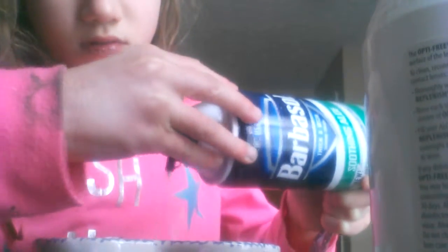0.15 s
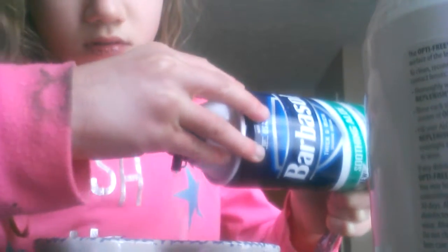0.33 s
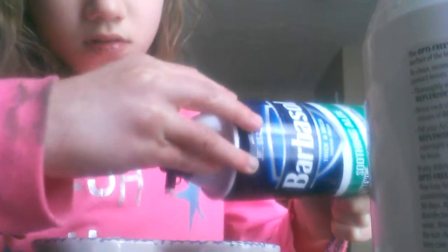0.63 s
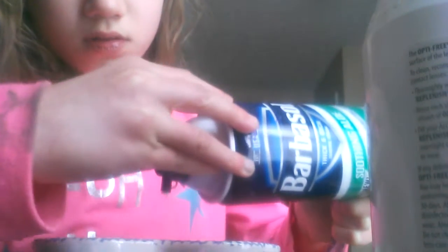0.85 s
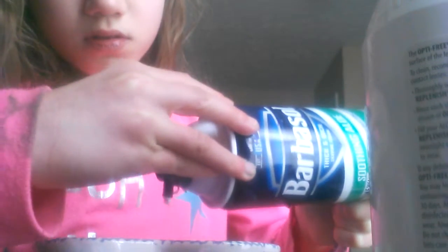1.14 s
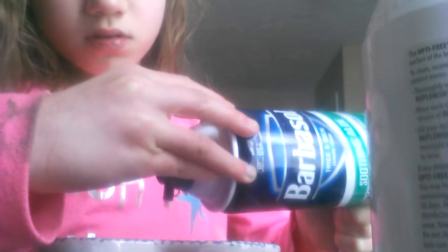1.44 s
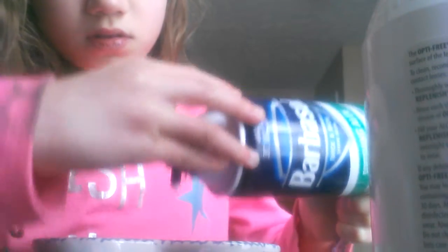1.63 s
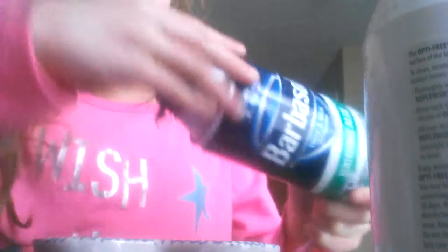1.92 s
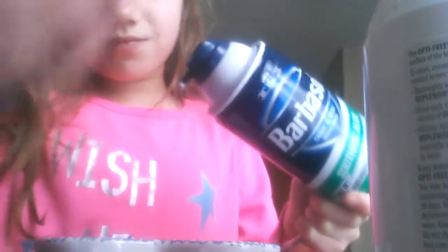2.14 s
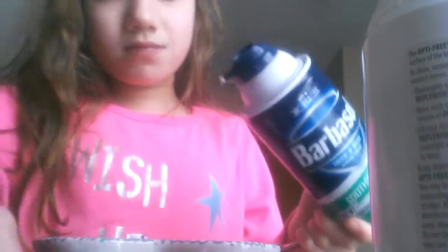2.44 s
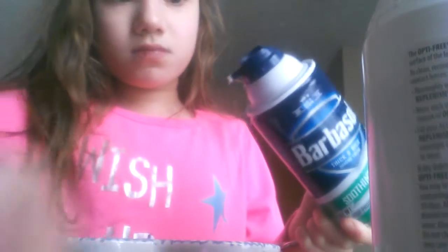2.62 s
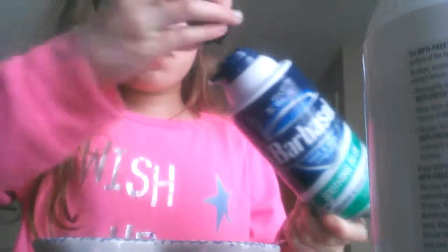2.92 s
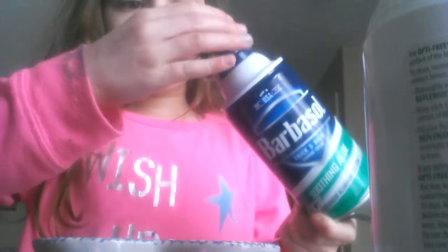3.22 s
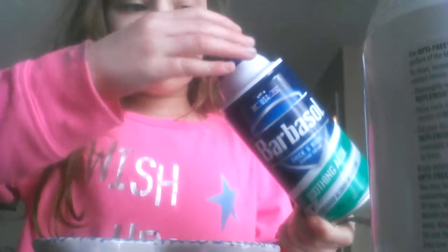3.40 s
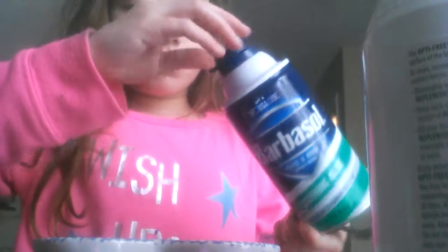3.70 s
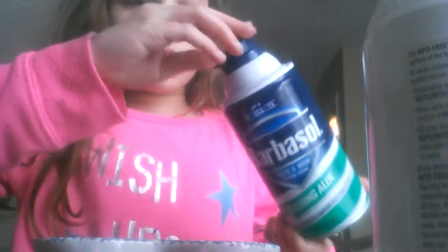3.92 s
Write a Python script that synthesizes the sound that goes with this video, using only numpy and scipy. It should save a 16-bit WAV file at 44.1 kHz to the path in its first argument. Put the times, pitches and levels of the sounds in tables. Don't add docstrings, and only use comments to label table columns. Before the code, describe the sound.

Very close to the microphones in a quiet furnished room, a pressurized can sprays foam: a brief whisper of gas, soft bumps, then a loud rough hiss full of wet spits and pops. It shuts off sharply. Afterwards fingers tick lightly on the hollow plastic cap while a dog barks twice, faint and muffled through walls, over a low hum.

```python
import sys
import numpy as np
from scipy import signal
from scipy.fft import rfft, irfft, next_fast_len
from scipy.io import wavfile
from scipy.ndimage import uniform_filter1d

SR = 44100
rng = np.random.default_rng(int(sys.argv[2]) if len(sys.argv) > 2 else 0)


def elevation(decibels):
    levels = np.asarray(decibels, float)
    return 10 ** (levels / 20)


def store_wav(level_fs):
    pcm = np.round(np.clip(np.atleast_2d(level_fs), -1, 1) * 32767)
    wavfile.write(sys.argv[1], SR, pcm.T.astype(np.int16))


N = 178913


def rms_one(x):
    return x / np.sqrt(np.mean(x ** 2) + 1e-20)


def at_hz(points, hz):
    points_hz, values = np.transpose(points)
    return np.interp(np.log(hz + 1), np.log(points_hz), values)


def filtered(x, response):
    size = next_fast_len(N + SR // 2)
    hz = np.arange(size // 2 + 1) * SR / size
    return irfft(rfft(x, size) * response(hz), size)[..., :N]


def butter(x, hz, kind, order=2):
    return signal.sosfilt(signal.butter(order, hz, kind, fs=SR, output="sos"), x)


def resonance(x, hz, width_hz):
    r = np.exp(-np.pi * width_hz / SR)
    zeros = np.array([1, 0, -1]) * (1 - r * r) / 2
    return signal.lfilter(zeros, [1, -2 * r * np.cos(2 * np.pi * hz / SR), r * r], x)


def drift(rate_hz):
    r = np.exp(-2 * np.pi * rate_hz / SR)
    settled = signal.lfilter([1], [1, -2 * r, r * r], rng.standard_normal(N + SR))[SR:]
    return rms_one(settled)


def add(out, s, grain):
    at = round(s * SR)
    out[..., at:at + grain.shape[-1]] += grain[..., :N - at]


def fading(t60, count=2048):
    t = np.arange(count) / SR
    return t, elevation(-60 * t / t60)


ECHOES = rng.standard_normal((2, 16384))


def room(x, far_db=0):
    out = x
    for t60, level_db in (0.009, -11), (0.18, -4.5 + far_db):
        t, fade = fading(t60, count=16384)
        cloud = ECHOES * fade * np.minimum(t / t60 * 20, 1)
        dulling = 300 / t60 ** 2
        cloud = butter(cloud, dulling / (1 + dulling / 18000), "low", order=1)
        cloud = cloud / np.sqrt(np.sum(cloud ** 2, axis=1, keepdims=True))
        out = out + elevation(level_db) * signal.fftconvolve(x, cloud, axes=1)[:, :N]
    return out


def seep():
    whisper = rms_one(resonance(rng.standard_normal((2, N)), 2400, 510))
    seep_ends_s = 0.19
    return elevation(-45.5) * whisper * (np.arange(N) < seep_ends_s * SR)


# frequency in Hz, density in dB per Hz.
HUM = [(12, -59.5), (20, -25.5), (145, -4), (265, -13.5), (292, -6.5), (320, -16), (426, -16.5),
       (546, -17.5), (897, -23.5), (1180, -25), (2110, -28), (4200, -32), (4950, -32), (5840, -35.5),
       (12300, -31.5), (14500, -33)]


def hum():
    noise = rms_one(filtered(rng.standard_normal((2, N)), lambda hz: elevation(at_hz(HUM, hz))))
    return elevation(-58.5 + 3.5) * noise


def whine():
    hz = 12380 + 120 * drift(.8) + 90 * drift(150)
    return elevation(-78 + 2.7 * drift(5)) * np.sin(2 * np.pi * np.cumsum(hz) / SR)


# start in seconds, peak in dB, pitch in Hz.
KNOCKS = [
    (0.063, -30, 297),
    (0.079, -23, 478),
    (0.091, -21, 1147),
    (.125, -29, 452),
]


def knocks():
    out = np.zeros(N)
    t, fade = fading(0.036)
    for s, peak_db, hz in KNOCKS:
        bump = np.sin(2 * np.pi * hz * t) * fade * np.minimum(t / 0.0016, 1)
        add(out, s, elevation(peak_db + 14.5) * bump)
    return out


# start in seconds, peak in dB, ring in Hz, spray
# in dB.
SPITS = [(0.068, -26.5, 2380, -19.5), (0.089, -20.5, 3800, -14), (0.1098, -5.5, 1900, -9),
         (0.1162, -1, 3650, -12), (0.2655, -6, 3620, -16), (0.4355, -14, 3370, -11.5),
         (0.457, -2.5, 2590, -12), (0.6256, 0.5, 3740, -6), (0.7354, -5, 3350, -17),
         (0.7743, -9.5, 3400, -25.5), (0.808, -6.5, 3240, -17.5), (0.889, -9, 4490, -20),
         (0.9114, -2.5, 1900, -5), (0.931, -1.5, 4500, -6), (0.9553, -11.5, 2920, -22),
         (0.9991, -4.5, 3420, -19), (1.011, -4, 2550, -7.5), (1.042, -4.5, 2830, -1.5),
         (1.0815, -2.5, 2060, -6.5), (1.133, -4, 3670, -15.5), (1.153, -2.5, 3690, -28.5),
         (1.255, -8, 2080, -13), (1.3233, -3, 2000, -19), (1.3394, -2, 2000, -16), (1.3661, -4, 3313, -21),
         (1.3762, -0.5, 3450, -15), (1.5145, 1, 2600, -19), (1.585, -5.5, 2180, -13),
         (1.634, -3, 3700, -25.5), (1.6402, -4.5, 3300, -19),
         (0.099, -10, 1896, -18.5), (0.143, -5.5, 5600, -11), (0.164, -5.5, 2900, -13.5),
               (0.169, -5.5, 1900, -10), (0.205, -9.5, 3505, -13.5), (0.209, -8.5, 3600, -16.5),
               (0.185, -1, 2503, -19), (0.2242, -7.5, 3690, -14.5), (0.254, -8, 2787, -15.5),
               (0.367, -7, 3704, -16), (0.391, -11, 3700, -12), (0.405, -12, 3600, -11),
               (0.424, -14, 3510, -15), (0.473, -6, 2806, -15), (0.493, -10.5, 3470, -14.5),
               (0.543, -13, 3506, -14), (0.562, -19, 3554, -15), (0.589, -15, 3490, -16),
               (0.527, -13, 2820, -19), (0.609, -5, 3660, -24.5), (0.648, -16, 3665, -22),
               (0.674, -8.5, 3306, -22), (0.704, -10.5, 3430, -16.5), (0.812, -4, 2903, -17.5),
               (0.851, -9, 2080, -17), (0.989, -12.5, 3320, -20.5), (1.088, -4.5, 4520, -14.5),
               (1.141, -7.5, 3490, -16.5), (1.187, -16.5, 3640, -23), (1.2, -8, 1940, -18.5),
               (1.235, -28, 3640, -17.5), (1.274, -12, 2707, -15), (1.307, -13, 1973, -14.5),
               (1.398, -12, 3510, -21), (1.417, -23.5, 1910, -10.5), (1.482, -10.5, 2120, -19),
               (1.504, -7, 3300, -22.5), (1.524, -17.5, 3600, -17), (1.542, -10.5, 1748, -24),
               (1.553, -17, 3707, 3.5), (0.843, -9.5, 3380, -18.5), (1.384, -6.5, 3260, -19),
               (1.448, -15, 3300, -17), (1.574, -18, 2790, -16), (1.599, -13.5, 2937, -17),
               (1.625, -21.5, 3014, -16.5), (1.644, -8.5, 3273, -20.5), (1.709, -19.5, 3000, -16.5)]


def spits():
    thud_at_2k_db, thud_db_per_octave = 2, -15.5
    pop_db, pop_t60_s = 4, 0.0027
    out = np.zeros(N)
    t, fade = fading(0.014, count=1024)
    click = 2.7 * (np.arange(len(t)) == 1)
    for s, peak_db, hz, spray_db in SPITS:
        dull, ring, bright = rng.standard_normal((3, len(t))) * fade * np.minimum(t / 0.000063, 1)
        thud_db = thud_at_2k_db + thud_db_per_octave * np.log2(hz / 2000)
        thud = rms_one(butter(dull, [300, 1500], "band"))
        spray = rms_one(butter(bright, [5000, 13000], "band", order=1))
        pop = rms_one(butter(dull * elevation(-60 * t / pop_t60_s) + click, [400, 9000], "band", order=1))
        puff = rms_one(resonance(ring, hz, 1400))
        puff = puff + elevation(thud_db) * thud + elevation(spray_db + 11.5) * spray + elevation(pop_db) * pop
        add(out, s, elevation(peak_db + 8) * puff / np.abs(puff).max())
    return out


# time in seconds, flow in dB.
JET = [(0, -51), (.058, -53.5), (.066, -46), (.077, -33), (.083, -24.5), (.11, -19.5), (.25, -19),
       (.46, -23), (.65, -25), (.95, -23.5), (1.15, -24.5), (1.29, -29.5), (1.375, -23), (1.45, -29),
       (1.53, -24), (1.715, -29), (1.745, -53), (1.78, -88.5)]
# centre in seconds, length in seconds, loss in dB.
CHOKES = [(0.602, .04, 2.5), (0.633, 0.011, 3.5), (0.76, 0.01, 4), (1.508, .008, 3), (0.838, 0.0311, 1),
          (1.055, 0.018, 4), (1.084, 0.0348, 1), (1.206, .03, 1.5), (1.321, .02, -0.5), (1.457, .03, 0),
          (1.567, 0.057, 4.0), (1.626, .03, 2)]


def valve_flow():
    t = np.arange(N) / SR
    flow_db = np.interp(t, *np.transpose(JET))
    for s, length, loss_db in CHOKES:
        flow_db = flow_db - loss_db * np.exp(-((t - s) / length * 2) ** 2)
    return flow_db


# frequency in Hz, share from 0 to 1.
UNSHARED = [(300, .3), (2000, 0.06), (5000, 0.42), (6400, 0.5), (7900, 0.27), (9000, 0.4), (10200, .3),
            (12000, .6), (13500, 0.6)]


def turbulence():
    common, own = rng.standard_normal(N), rng.standard_normal((2, N))
    share = lambda hz: np.clip(at_hz(UNSHARED, hz), 0, 1)
    together = filtered(common, lambda hz: np.sqrt(1 - share(hz)))
    return together + filtered(own, lambda hz: np.sqrt(share(hz)))


def roar(flow_db):
    spits_per_s = 220 * elevation(0.26 * (flow_db + 24.5))
    born = (rng.random(N) < spits_per_s / SR) * elevation(1.4 * np.minimum(rng.exponential(1, N), 1.3))
    swell = signal.lfilter([.65], [1, -elevation(-60 / (0.009 * SR))], born)
    white = butter(turbulence(), [150, 8000], "band", order=1)
    noise = 0
    for octave in np.arange(7, 15, .5):
        band = filtered(white, lambda hz: np.clip(1 - 2 * np.abs(np.log2(hz + 1) - octave), 0, 1))
        noise = noise + band * elevation(1.6 * drift(9.0))
    swelling = (1 + swell) / (1 + uniform_filter1d(swell, 4096))
    return elevation(flow_db + 5.0) * rms_one(noise) * swelling * elevation(drift(35))


def hiss(flow_db):
    level_db = -31.5 + 0.93 * (flow_db + 28) + 2.4 * drift(16)
    return elevation(level_db) * rms_one(butter(turbulence(), 3685, "high", order=1))


def gurgle(flow_db):
    churn = rms_one(butter(turbulence(), [300, 700], "band"))
    return elevation(-34 + 2.57 * (flow_db + 23.0) + 5.6 * drift(48)) * churn


# frequency in Hz, width in Hz,
# left gain in dB, right gain in dB.
NARROW = [(900, 145, 1.5, 2.5), (1900, 140, -11, 2.5), (2619, 128.4, 0.5, -3), (2050, 120, 1.5, -0.5),
          (2300, 79, -3.5, -14.5), (2865, 109.3, 3, 7.5), (3086, 300, -7, -5), (3690, 450, 3, 7.5),
          (4013, 540, -4, -12.5), (4520, 200, 5.5, 4.5), (5140, 200, -6, 10.5), (5300, 80, 2.5, 1),
          (3717, 49, 0.5, 3), (6850, 350, 8, -0.5), (7440, 230, 1.5, -2), (9030, 370, -7, 7),
          (490, 53, 1.5, 4.5), (1186, 320, 0.5, 5), (1344, 130, -2, -4), (4370, 90, -2, -4.5),
          (2450, 100, -1, 0.5), (5600, 400, 1, -2), (12650, 446, -2, 1), (10830, 170, 7, 9),
          (11440, 370, -1, 4.5), (10250, 300, 2, 3), (8170, 280, 1.5, -4), (12220, 360, -5, -4)]


def shading(hz, smooth, side):
    narrow_db = sum(row[2 + side] / (1 + (2 * (hz - row[0]) / row[1]) ** 2) for row in NARROW)
    return elevation(at_hz(smooth, hz) + narrow_db)


# frequency in Hz, gain in dB.
TO_LEFT = [(190, -19), (290, -14), (420, -11.5), (1000, -11.5), (1350, -20.5), (1900, 5), (2250, -6.5),
           (2900, 1.5), (4400, -4.5), (4750, -14), (5600, -11.5), (6700, -13.5), (7000, -7.5),
           (10100, -6.5), (12300, -5.5)]
TO_RIGHT = [(190, -14.5), (280, -15), (340, -18), (420, -16), (1000, -8), (1400, -17.5), (2000, 2.5),
            (3300, -0.5), (4500, 5), (5000, -6), (6700, -1.5), (7200, -3.5), (9000, -7.5), (10800, -7),
            (12200, -6), (13600, -3.5)]
# frequency in Hz, turn in radians.
RIGHT_TURN = [(200, 0.17), (700, 1.2), (3700, 0.43), (4000, 4.1), (7200, 4.5), (7800, 2.3), (8550, 5),
              (9000, 0.7), (9300, 0.4), (9600, 1.9), (10200, 2.8), (11000, 2.4), (11900, 2.9), (12300, 3.9),
              (14000, 3.8)]


def at_microphones(x):
    table_echo_s, table_echo_db, spout_sway = 0.000887, -19, 0.019
    echo = lambda hz: 1 + elevation(table_echo_db) * np.exp(-2j * np.pi * hz * table_echo_s)
    turn = lambda hz: np.exp(1j * at_hz(RIGHT_TURN, hz))
    sway, out = .5 + .5 * np.tanh(drift(2.0)), 0
    for share, shift in (sway, 1 + spout_sway), (1 - sway, 1 - spout_sway):
        left = filtered(share * x[0], lambda hz: shading(hz * shift, TO_LEFT, side=0))
        to_right = lambda hz: shading(hz * shift, TO_RIGHT, side=1) * turn(hz) * echo(hz)
        right = filtered(share * x[1], to_right)
        out = out + np.array([left, right])
    return room(out, far_db=-6.0)


# start in seconds, peak in dB, ring in Hz, crack in Hz, crack level in dB.
TICKS = [(1.961, -47.5, 2720, 3280, -18), (2.0491, -50.5, 2600, 3320, 15), (2.049, -48, 752, 702, -3),
         (2.605, -52, 2500, 2600, -5), (2.857, -63, 5090, 5100, -9), (3.389, -52, 5300, 5560, 3),
         (2.624, -42.5, 2060, 3300, 17.5), (2.6237, -50, 600, 5070, 19), (2.867, -54.5, 5110, 2300, -2),
         (3.128, -41.5, 2516, 4580, 9), (3.213, -39.5, 2220, 1500, 9), (3.3244, -44.5, 2400, 4930, 5),
         (3.352, -44.5, 2070, 4810, 14.5), (3.412, -41.5, 2400, 5300, 13.5),
         (3.4334, -39.5, 2050, 1000, -2), (3.5661, -52, 2100, 5300, -11), (3.6043, -31, 2180, 4980, -11),
         (3.6045, -46.5, 1160, 8400, 19.5), (3.6403, -48, 2230, 4020, -14.5), (3.644, -43, 2200, 4000, -9),
         (3.9624, -38, 4400, 5300, 0), (3.963, -46.5, 3400, 3410, 8), (3.985, -53, 4600, 4580, -7.5),
         (4.0012, -52, 1795, 3920, 12.5)]


def cap():
    out = np.zeros((2, N))
    t, fade = fading(0.035, count=4096)
    rise = np.minimum(t / 0.0012, 1)
    for s, peak_db, hz, crack_hz, crack_db in TICKS:
        rung = 1.93 * np.sin(2 * np.pi * hz * t) * elevation(-60 * t / 0.0046)
        rattle = 0.6 * resonance(rng.standard_normal(len(t)), hz, 0.26 * hz) * fade
        snap = rng.standard_normal(len(t)) * elevation(-60 * t / 0.0043) * rise
        broad = butter(snap, [0.45 * crack_hz, 1.6 * crack_hz], "band")
        crack = elevation(crack_db) * (resonance(snap, crack_hz, 0.25 * crack_hz) + 0.27 * broad)
        body = butter((rung + rattle) * rise + crack, 8800, "low", order=4)
        add(out, s, elevation(peak_db + 7.5) * body * elevation([[-1.5], [1.5]]))
        add(out, s, elevation(peak_db - 24.5) * butter(snap, 7000, "high"))
    return room(out, far_db=-7.0)


# start in seconds, pitch in Hz, effort in dB, seconds until the pitch sags,
# fall in dB per second.
BARKS = [
    (2.049, 499.4, -56.5, 0.0486, 140),
    (3.293, 504.5, -57.5, .085, 186),
]
# resonance in Hz, width in Hz, level in dB.
WALLS = [(437, 66, 4.5), (529, 66, 3.5), (940, 50, -13), (650, 34, -3), (820, 74, -1.5), (1080, 160, -10),
         (1288, 580, -60)]


def dog():
    rise_s, hold_s, sag_share, sag_s = 0.046, 0.054, 0.11, 0.0298
    voice = np.zeros(N)
    for s, pitch_hz, effort_db, sag_at_s, fall_db_per_s in BARKS:
        t = np.arange(N) / SR - s
        sag = 1 - sag_share * np.clip((t - sag_at_s) / sag_s, 0, 1)
        cycle = np.cumsum(pitch_hz * sag * (1 + 0.0232 * drift(36.9))) / SR % 1
        hoarse = 2 * cycle - 1 + 2.7 * rng.standard_normal(N)
        fall_db = fall_db_per_s * np.maximum(t - rise_s - hold_s, 0)
        voice += hoarse * elevation(effort_db + 9.5 - fall_db) * np.clip(t / rise_s, 0, 1)
    through = sum(elevation(level_db) * resonance(voice, hz, width) for hz, width, level_db in WALLS)
    through = butter(through, 2000, "low")
    pair = np.array([np.roll(through, shift=14), through])
    return room(pair * elevation([[-1.5], [1.5]]), far_db=-4.0)


def scene():
    flow_db = valve_flow()
    is_open = np.arange(N) < JET[-1][0] * SR
    gas = (roar(flow_db) + hiss(flow_db) + gurgle(flow_db)) * is_open
    jet = gas + spits() + knocks()
    mix = at_microphones(jet) + cap() + dog() + hum() + whine() + seep()
    return .9 * np.tanh(mix / .9)


# frequency in Hz, share from 0 to 1.
THINNING = [(700, .02), (1400, .12), (3400, .3), (7000, .5), (14000, .42)]


def masked_out(x, below_db):
    hop, start = 1024, 416
    k = np.arange(hop) + .5
    basis = np.cos(np.pi / hop * np.outer(np.arange(2 * hop) + .5 + hop / 2, k)) * np.sqrt(2 / hop)
    basis = basis * signal.windows.kaiser_bessel_derived(2 * hop, 4 * np.pi)[:, None]
    pair = np.pad([x[0] + x[1], x[0] - x[1]], ((0, 0), (2 * hop - start, 3 * hop)))
    halves = pair[:, :pair.shape[1] // hop * hop].reshape(2, -1, hop)
    frames = np.concatenate([halves[:, :-1], halves[:, 1:]], axis=2)
    lines, hz = frames @ basis, k * SR / 2 / hop
    around = uniform_filter1d(lines ** 2, size=96, axis=2) + 1e-20
    band = np.repeat(np.mean(lines.reshape(2, -1, hop // 16, 16) ** 2, axis=3), 16, axis=2)
    thin = lines ** 2 < around * at_hz(THINNING, hz) ** 2
    sunk = uniform_filter1d(band / around, size=2, axis=1) < elevation(2 * below_db)
    weak = thin | (sunk & (hz > 5000) & (hz < 14000))
    edge = np.diff(frames, axis=2) ** 2
    sharpest = uniform_filter1d(edge, size=64, axis=2).max(axis=(0, 2))
    clicky = sharpest > 9 * edge.mean(axis=2).max(axis=0)
    lost = (lines * weak * ~clicky[:, None]) @ basis.T
    lost = lost[:, 1:, :hop] + lost[:, :-1, hop:]
    mid, side = lost.reshape(2, -1)[:, hop - start:hop - start + N] / 2
    return x - np.array([mid + side, mid - side])


def top_cut(x):
    return signal.sosfilt(signal.butter(12, 15890, fs=SR, output="sos"), x)


# time in seconds, top octave in dB, share of bass kept from 0 to 1.
SNAPS = [(.084, -13, 1.1), (.215, -35, 0.18), (0.6271, -4, 0.5), (.81, -30, 0.1), (.92, -18.5, 0),
         (1.0412, -8, 0.03), (1.0806, -14.5, 0.01), (1.3384, -8.5, 0.4), (1.515, -4, 0.46),
         (1.72, -46.5, 0.9), (3.602, -2, .1), (3.961, -6, 0.2)]
# start in seconds, end in seconds, left edge in Hz, right edge in Hz.
BASS_DROPPED = [(.16, .22, 250, 260), (.32, .39, 230, 320), (.39, .5, 230, 210), (.5, .6, 260, 320),
                (.69, .74, 250, 320), (.8, .87, 300, 340), (.87, .99, 240, 340), (.99, 1.05, 310, 330),
                (1.05, 1.19, 240, 350), (1.19, 1.31, 250, 340), (1.38, 1.43, 230, 420),
                (1.43, 1.5, 230, 200), (1.53, 1.57, 210, 300), (1.57, 1.67, 250, 300)]


def record(dry):
    cutoff_hz = 14530
    loud_db = 10 * np.log10(uniform_filter1d(np.mean(dry ** 2, axis=0), 1024) + 1e-12)
    dropped, top_kept = np.clip((loud_db + 46) / 8, 0, 1), np.zeros(N)
    for s, top_db, share in SNAPS:
        at = round(s * SR)
        dropped[at - 1100:at + 1100] *= 1 - np.clip(share, 0, 1) * np.hanning(2200)
        top_kept[at - 128:at + 256] = elevation(top_db) * np.hanning(384)
    body = filtered(dry, lambda hz: 1 / (1 + (hz / cutoff_hz) ** 900))
    top_slope = lambda hz: elevation(-0.018 * np.maximum(hz - cutoff_hz, 0)) * (hz > cutoff_hz)
    dry = body + filtered(top_kept * (dry - body), top_slope)
    low = filtered(dry, lambda hz: 1 / (1 + (hz / 195) ** 30))
    bass = low
    for start, end, *edges_hz in BASS_DROPPED:
        inside = np.abs(np.arange(N) / SR - (start + end) / 2) < (end - start) / 2
        during = uniform_filter1d(1. * inside, size=512)
        wider = filtered(dry, lambda hz: 1 / (1 + (hz / np.c_[edges_hz]) ** 30))
        bass = bass + during * (wider - low)
    mix = masked_out(dry - .993 * dropped * bass, below_db=-3.3)
    return top_cut(mix)


dry = scene()
out = record(dry)
store_wav(out)
```